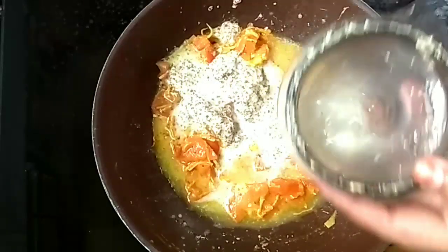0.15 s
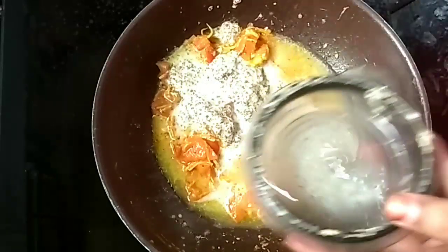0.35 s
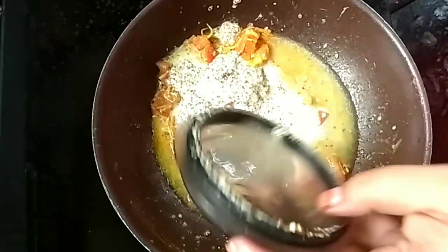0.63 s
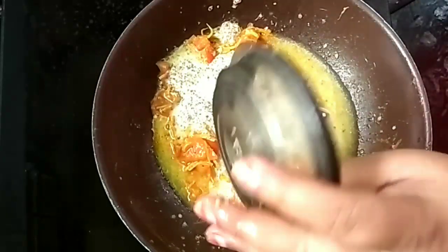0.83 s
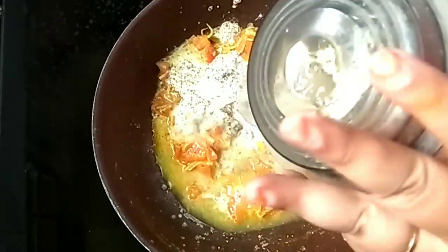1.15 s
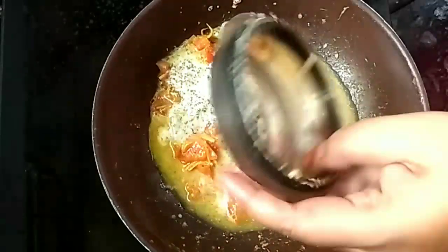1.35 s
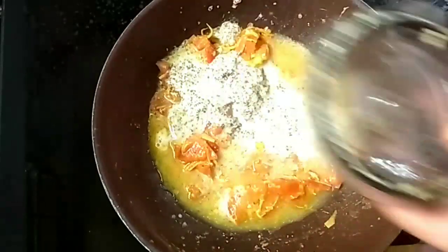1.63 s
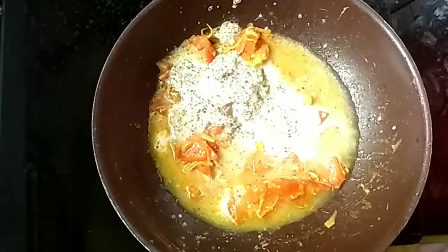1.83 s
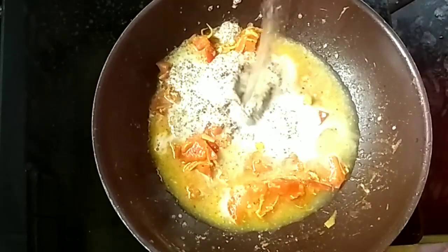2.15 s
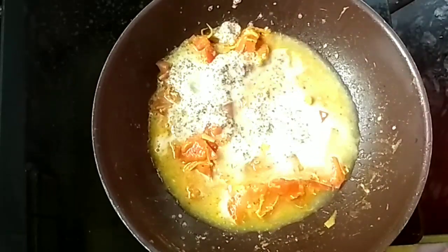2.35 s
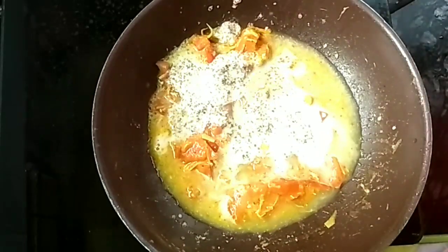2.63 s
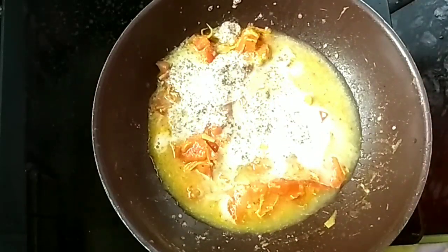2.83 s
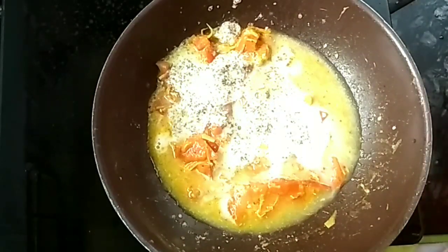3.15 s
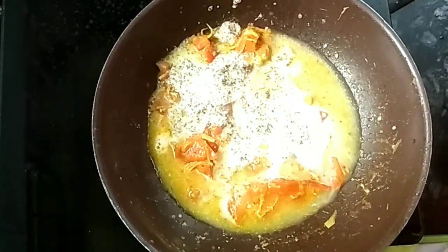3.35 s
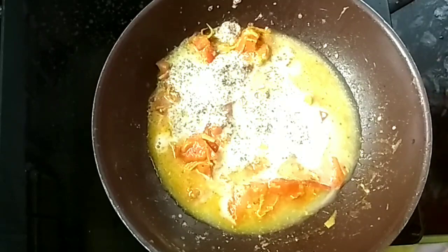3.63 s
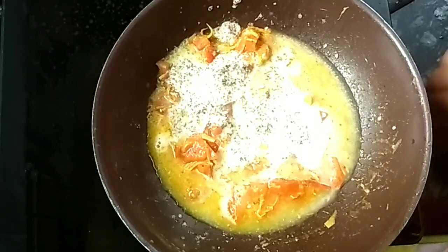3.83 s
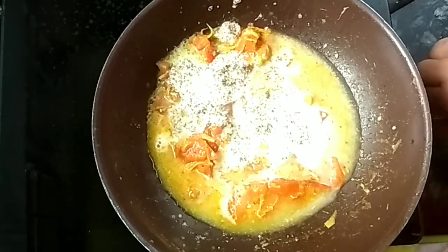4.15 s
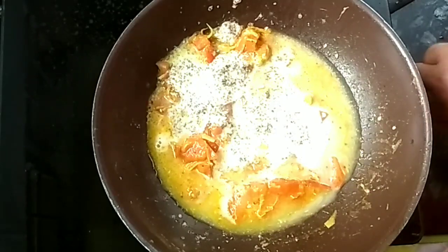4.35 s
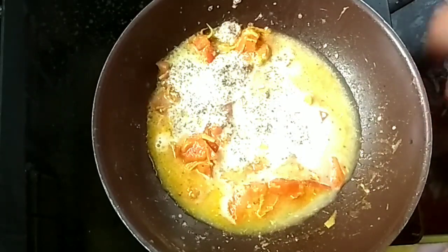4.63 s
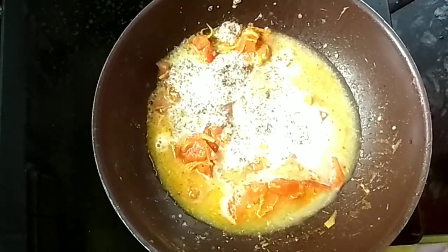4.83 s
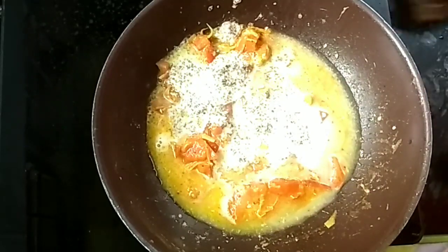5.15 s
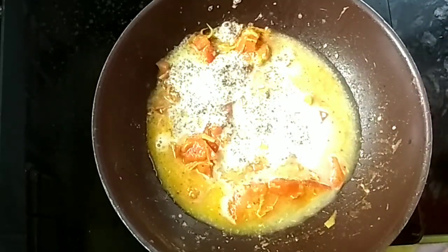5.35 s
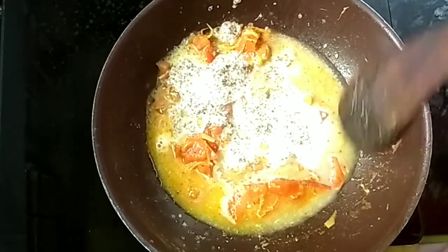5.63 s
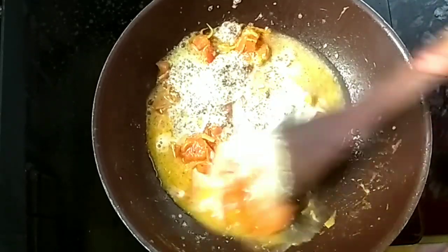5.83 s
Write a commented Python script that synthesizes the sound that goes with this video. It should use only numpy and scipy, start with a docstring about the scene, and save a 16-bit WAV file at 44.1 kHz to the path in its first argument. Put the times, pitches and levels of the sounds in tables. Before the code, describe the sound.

A continuous dull airy roar with low motor hum fills a small kitchen. Wind rumbles and flutters on the single microphone, strongest a little after four seconds. Over it, a thin bright scrape comes in quick pairs with each turn of the fan, dotted with crackly snaps. Faint high chirps come from a distance, two lower just after three seconds; sharp little knocks follow, the last two hardest.

```python
"""A fan near a pan in a kitchen roars and hums throughout, as shaped noise, room resonances and a sine.
From the start its draught buffets the microphone: noise in gusts and surges, with low thumps from 0.5 s on.
Four times a second, on every turn, something rubs twice: gritty noise, at first faint, with noise-burst snaps.
Faint narrow chirps of filtered noise come from further off, with two lower ones just after 3 s.
From 2.7 s to 4.7 s a few knocks set a small hard part ringing, the last two the hardest."""
import sys
import numpy as np
from scipy import signal
from scipy.fft import rfft, irfft
from scipy.io import wavfile
from scipy.ndimage import uniform_filter1d

SR = 44100
rng = np.random.default_rng(int(sys.argv[2]) if len(sys.argv) > 2 else 0)


def persist_wave(psi):
    """Save psi, clipped to +-1, as 16-bit WAV."""
    counts = np.round(np.clip(psi, -1, 1) * 32767).astype(np.int16)
    wavfile.write(sys.argv[1], SR, np.atleast_2d(counts).T)


N = 264090  # length in samples


def from_db(db):
    """Turn decibels into gain."""
    return 10 ** (np.asarray(db) / 20)


def rms_one(x):
    """Scale to rms 1."""
    return x / np.sqrt(np.mean(x ** 2) + 1e-20)


def coloured(x, spectrum):
    """Shape a signal by a (f/Hz, level/dB) spectrum, at -90 dB past its ends; rms 1."""
    hz, db = np.transpose(spectrum)
    log_bins = np.log(np.maximum(np.fft.rfftfreq(N, 1 / SR), 1))
    gain = from_db(np.interp(log_bins, np.log(hz), db, left=-90, right=-90))
    return rms_one(irfft(rfft(x) * gain, N))


def drift(rate_hz):
    """Slow chance: noise through a double one-pole low-pass, run in for a second; rms 1."""
    pole = np.exp(-2 * np.pi * rate_hz / SR)
    noise = rng.standard_normal(N + SR)
    return rms_one(signal.lfilter([1], [1, -2 * pole, pole * pole], noise)[SR:])


def evened(x, seconds, share):
    """Take a share of the chance swells out of a noise, so that its envelope sets the lumps; rms 1."""
    power = uniform_filter1d(x ** 2, round(seconds * SR)) + 0.064
    return rms_one(x / power ** (share / 2))


def ring(x, hz, t60):
    """A two-pole resonance: a unit click sets off a decaying sine of height 1."""
    radius = from_db(-60 / (t60 * SR))
    angle = 2 * np.pi * hz / SR
    feedback = [1, -2 * radius * np.cos(angle), radius * radius]
    return signal.lfilter([0, np.sin(angle)], feedback, x + 1e-18)


def clicks(events, scatter_db):
    """One impulse for each (t/s, level/dB) row, each a little stronger or weaker by chance."""
    s, db = np.transpose(events)
    out = np.zeros(N)
    out[np.round(s * SR).astype(int)] = from_db(db + scatter_db * rng.standard_normal(len(s)))
    return out


def draught():
    """Eddies press on the microphone port in lumps; one noise gives deep buffeting and quick flutter."""
    # strength of the draught: t/s, deep buffeting level/dB
    gusts = [(0, -42.5), (.28, -39), (.33, -53), (.38, -37), (.66, -46.5), (.74, -36), (1.0, -35),
             (1.5, -36.5), (1.8, -36.5), (1.88, -43.5), (2.5, -41), (2.72, -40.5), (2.92, -37),
             (3.0, -44.5), (3.9, -46), (4.02, -33.5), (4.4, -33.5), (4.82, -37), (4.9, -42.5),
             (5.08, -39.5), (5.5, -49.5), (5.7, -41.5), (5.85, -34), (5.99, -38)]
    # brief surges of air on top: t/s, deep buffeting level/dB, flutter level/dB before its trim
    surges = [(.52, -44, -42), (.96, -34, -49), (1.131, -37, -31), (1.259, -24.5, -42), (1.39, -31.5, -35),
              (1.48, -26.5, -36), (1.78, -32.5, -32.5), (1.951, -36.5, -35.5), (2.1, -36.5, -46),
              (2.23, -38, -51), (2.599, -32, -42.5), (2.792, -28, -34.5), (2.9, -31.5, -38.5),
              (3.22, -47, -44), (4.238, -24, -23.5), (4.32, -23, -35), (4.44, -39.5, -51),
              (4.54, -29.5, -36), (5.002, -29.5, -33), (5.29, -36, -53), (5.64, -47, -38), (5.75, -33, -61),
              (5.88, -46, -31.5), (5.94, -31, -40.5)]
    # spectra of the deep buffeting and of the flutter: f/Hz, relative level/dB
    buffet_spectrum = [(4, -8), (9, -1), (23, 0), (32, -2), (52, -2), (70, -8), (100, -17), (200, -30)]
    flutter_spectrum = [(50, -9.5), (90, 0.5), (150, -7.5), (250, -9), (400, -23.5), (600, -30)]
    # flutter before its trim when the draught is at the reference; dB gained per dB of draught
    flutter_db, flutter_grows, reference_gust_db = -49, 1.7, -36
    flutter_trim_db = -8.0
    deep_surge_s, flutter_surge_s = 0.021, 0.02  # from the peak to 1/e of its power

    t = np.arange(N) / SR
    gust_db = np.interp(t, *np.transpose(gusts))
    deep_power = from_db(2 * gust_db)
    steady_flutter_db = flutter_db + flutter_grows * (gust_db - reference_gust_db)
    flutter_power = from_db(2 * (steady_flutter_db + 0.9 * drift(11.0)))
    for s, surge_deep_db, surge_flutter_db in surges:
        near = slice(int(s * SR) - SR // 5, int(s * SR) + SR // 5)
        since = t[near] - s
        deep_power[near] += from_db(2 * surge_deep_db) * np.exp(-(since / deep_surge_s) ** 2)
        flutter_power[near] += from_db(2 * surge_flutter_db) * np.exp(-(since / flutter_surge_s) ** 2)

    eddies = rng.standard_normal(N) * from_db(3.76 * drift(24.0))
    deep = evened(coloured(eddies, buffet_spectrum), 0.063, share=0.6)
    quick = evened(coloured(eddies, flutter_spectrum), 0.03, share=0.93)
    quick = quick * from_db(4.1 * drift(29.0) + flutter_trim_db)
    return np.sqrt(deep_power) * deep + np.sqrt(flutter_power) * quick


def thumps():
    """Single strong eddies push and pull on the port for about one and a half cycles each."""
    # t/s of the start, level/dB before the trim, f/Hz
    eddy_thumps = [(0.506, -29, 86), (0.821, -42, 82.5), (1.04, -26, 82), (1.123, -27, 51.1),
                   (1.37, -33, 78.1), (1.473, -19, 52), (2.759, -22.5, 91), (2.884, -40, 96.9),
                   (3.988, -21.5, 50.6), (4.174, -15, 51), (4.225, -22, 51.1), (4.423, -20.5, 101),
                   (4.53, -23, 51.7), (4.695, -21, 52.3), (4.793, -22.5, 72), (5.269, -32, 68)]
    trim_db = -6.5
    out = np.zeros(N)
    for s, db, hz in eddy_thumps:
        cycles = np.arange(0, 1.5, hz / SR)
        at = round(s * SR)
        pulse = np.sin(2 * np.pi * cycles) * np.hanning(len(cycles))
        out[at:at + len(cycles)] += from_db(db + trim_db) * pulse
    return out


def roar():
    """The fan's air stream is smooth noise, slightly swaying; room resonances and the motor hum stand out."""
    # spectrum of the air stream: f/Hz, relative level/dB
    air_spectrum = [(40, -9.5), (100, -7), (160, -2.5), (260, -0.5), (342, -8.5), (420, -9), (505, -13),
                    (740, -12.5), (985, -17), (1580, -19.5), (2100, -24.5), (2700, -28.5), (3100, -32.5),
                    (3800, -33.5), (4900, -39.5), (7700, -45.5), (11400, -42.5), (15500, -55)]
    # narrow resonances of the room: f/Hz, level/dB, t60/s
    room_modes = [(205.4, -60.5, 0.24), (275, -63, 0.32), (549.6, -72.5, 0.28), (641, -77, .2),
                  (733, -70.5, 0.14)]
    air_db, hum_hz, hum_db = -51, 48.5, -53
    sway_db = 0.4 * drift(6)
    air = from_db(air_db + sway_db) * coloured(rng.standard_normal(N), air_spectrum)
    modes = sum(from_db(db) * rms_one(ring(rng.standard_normal(N), hz, t60)) for hz, db, t60 in room_modes)
    hum = from_db(hum_db) * np.sin(2 * np.pi * hum_hz * np.arange(N) / SR)
    return air + modes + hum


def touching():
    """How hard the parts touch: on each turn a short swelling rub, then a longer second one."""
    # t/s and level/dB of the first rub, its swell/s, delay/s of the second, second's level/dB, its fade/s
    turns = [(-.07, -75, .03, 0.083, -70.5, .034), (.188, -69.5, 0.041, 0.1, -66, 0.035),
             (.448, -64.7, 0.034, .058, -66, 0.072), (.706, -68, .032, .036, -66, 0.068),
             (.966, -63.5, 0.04, 0.038, -66, .044), (1.183, -61.5, 0.018, 0.062, -65, 0.051),
             (1.44, -62, .019, .043, -68.5, 0.066), (1.676, -62, 0.021, 0.065, -64.5, 0.059),
             (1.945, -61, 0.019, .053, -63.5, 0.041), (2.187, -58.5, 0.018, 0.06, -64, 0.045),
             (2.449, -58.5, .02, 0.048, -64, 0.039), (2.698, -61, .025, 0.082, -68, .032),
             (2.949, -59, .025, 0.089, -63.5, .026), (3.209, -62, .027, 0.045, -67.5, .041),
             (3.43, -59.5, .014, 0.079, -64.5, 0.035), (3.683, -60, 0.022, .058, -69, .079),
             (3.93, -56, 0.013, 0.055, -66, .051), (4.181, -58.5, .018, 0.041, -65.5, 0.044),
             (4.427, -61, 0.019, .033, -64.5, 0.071), (4.677, -58.5, 0.02, 0.055, -64.5, 0.055),
             (4.923, -65.5, 0.03, .08, -66, .016), (5.147, -64.5, 0.036, 0.095, -66, 0.018),
             (5.382, -66, 0.029, 0.064, -66.5, 0.044), (5.612, -63.5, 0.018, 0.082, -65, 0.032),
             (5.85, -61, 0.018, 0.058, -66, 0.049)]
    first_fall_s = 0.006  # the first rub breaks off short
    # the second starts this long after the first and swells over a share of the time left
    second_from_s, second_rises = 0.027, 0.59
    pointed = 1.4  # higher makes sharper peaks
    t, power = np.arange(N) / SR, np.zeros(N)
    for s, first_db, swell_s, delay, second_db, fade_s in turns:
        first = s, first_db, swell_s, first_fall_s
        second = s + delay, second_db, second_rises * (delay - second_from_s), fade_s
        near = slice(max(int(s * SR) - SR // 3, 0), int(s * SR) + SR // 2)
        for centre_s, db, rise, fall in (first, second):
            since = pointed * (t[near] - centre_s)
            swell = 2 / (np.exp(-since / max(rise, 0.003)) + np.exp(since / max(fall, 0.003)))
            power[near] += from_db(2 * db) * swell ** (2 / pointed)
    return np.sqrt(power)


def grit():
    """Grains catch at random; each rings a few cycles at a pitch of its own, over a smooth scrape."""
    sizes = from_db(4 * np.minimum(rng.exponential(1, N), 4.5)) * rng.choice([-1, 1], N)
    grains_per_s = 4000.0 * from_db(3.0 * drift(70.0))
    caught = sizes * (rng.random(N) < grains_per_s / SR)
    pitches_hz = np.geomspace(4000, 15500, num=16)
    dealt = rng.integers(0, 16, size=N)  # which pitch each grain takes
    rings = sum(np.sqrt(hz) * ring(caught * (dealt == k), hz, 20.0 / hz) for k, hz in enumerate(pitches_hz))
    return rms_one(rings) + 1.18 * rng.standard_normal(N)


def rubbing(contact):
    """Grit hisses under each rub; the harder the contact, the further down the hiss reaches."""
    # spectra of the thin top and of the lower body: f/Hz, relative level/dB
    top_spectrum = [(6500, -38), (8000, -11.5), (9500, -4), (11300, 4), (13000, 0), (15500, -5)]
    body_spectrum = [(3500, -1), (5000, 0.5), (6000, 6.5), (7000, 2.5), (8500, 2), (10000, -27)]
    grains = grit()
    pressure = contact / from_db(-65.5)
    top = coloured(grains, top_spectrum)
    body = from_db(-12.5) * pressure ** 0.2 * coloured(grains, body_spectrum)
    return contact * (top + body)


def knocks():
    """A crack and a hit at once, then a bounce; hit and bounce strike each mode with a strength of its own."""
    # knocks on a small hard part: t/s, strength level/dB before chance scatter
    hits = [(2.7005, -50), (3.9674, -51), (4.2148, -43), (4.4602, -34.5), (4.7162, -34)]
    # modes of the part: f/Hz, level/dB before the trim, t60/s
    part_modes = [(3300, -21, 0.017), (4380, -20, 0.022), (5860, -7, 0.012), (7380, -10, 0.023),
                  (7900, -14, 0.029), (8320, -5.5, 0.02), (9520, -1, 0.033), (10040, -0.5, 0.013),
                  (10280, -1, 0.013), (11040, -4, 0.0081), (12300, -9, .012), (13100, -6, .012),
                  (14600, -22, .015)]
    mode_trim_db, bounce_s = -7.0, 0.0012  # the bounce follows the hit by this time
    thin = signal.butter(2, [4000.0, 15000.0], "band", fs=SR, output="sos")
    out = signal.sosfilt(thin, clicks(hits, scatter_db=0.5))  # the crack
    for k, (hz, db, t60) in enumerate(part_modes):
        sign = (-1) ** k  # neighbouring modes start in opposite directions
        hit = clicks(hits, scatter_db=2.5) * from_db(db + mode_trim_db) * sign
        bounce = 0.29 * np.roll(hit, round(bounce_s * SR))
        out += ring(hit + bounce, hz, t60)
    return out


def snaps(contact):
    """Dry snaps inside the rubbing: bursts of noise, thin and bright, that die away in milliseconds."""
    # the clearest snaps: t/s, strength level/dB before scatter, filter and trim
    clear_snaps = [(0.436, -52), (0.9418, -55), (0.9654, -57), (1.3108, -50), (1.6654, -52), (1.7604, -52),
                   (1.8497, -59), (1.9375, -50), (2.5132, -53), (2.684, -48), (2.9926, -51), (3.044, -52),
                   (3.771, -47), (4.4324, -52), (4.7691, -52), (5.1282, -49), (5.253, -54), (5.466, -53)]
    # fainter ones come by chance, likelier the harder the contact; strength before scatter, filter and trim
    small_per_s, small_db = 2.8, -57
    t60, trim_db = 0.008, -1.5
    small = rng.random(N) < small_per_s * contact / contact.mean() / SR
    small_starts = small * from_db(small_db + 2 * rng.standard_normal(N))
    starts = clicks(clear_snaps, scatter_db=2.5) + small_starts
    burst = signal.lfilter([1], [1, -from_db(-60 / (t60 * SR))], starts)
    bright = signal.butter(2, [6000.0, 14500.0], "band", fs=SR, output="sos")
    return from_db(trim_db) * signal.sosfilt(bright, burst * rng.choice([-1, 1], N))


def chirps():
    """Throbbing noise in a narrow resonance, starting at once and dying away."""
    # t/s, starting level/dB before the throb, f/Hz, t60/s
    far_chirps = [(0, -72, 9100, 0.28), (.97, -71, 8900, 0.29), (1.38, -71, 8900, 0.32),
                  (2.40, -71, 8800, .25), (2.81, -75, 9300, .5), (2.985, -71, 9000, .15),
                  (3.055, -62, 4180, 0.095), (3.073, -65, 4060, 0.12), (3.81, -73.5, 9350, .7),
                  (4.99, -69, 8850, .25), (5.02, -76, 9200, 0.43)]
    width_hz = 340
    out, t = np.zeros(N), np.arange(SR // 2) / SR
    throb = from_db(2 * drift(60))
    for s, db, hz, t60 in far_chirps:
        band = signal.butter(1, [hz - width_hz / 2, hz + width_hz / 2], "band", fs=SR, output="sos")
        narrow = rms_one(signal.sosfilt(band, rng.standard_normal(len(t))))
        tone = evened(narrow, 0.008, share=0.7)
        at = round(s * SR)
        out[at:at + len(t)] += from_db(db - 60 * t / t60) * tone
    return out * throb


def scene():
    """All sources add up at one microphone; the rubbing and the snaps share one contact."""
    contact = touching()
    air = draught() + thumps() + roar()
    parts = rubbing(contact) + knocks() + snaps(contact)
    return (air + parts + chirps())[None]


def record(dry):
    """A steep elliptic low-pass cuts the top."""
    cutoff_hz = 15550
    return signal.sosfilt(signal.ellip(12, 0.5, 70, cutoff_hz, fs=SR, output="sos"), dry)


dry = scene()
out = record(dry)
persist_wave(out)
```